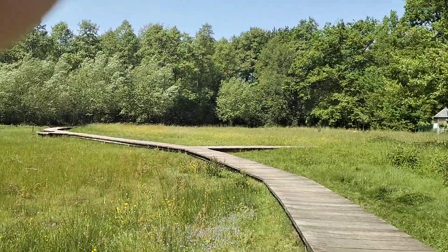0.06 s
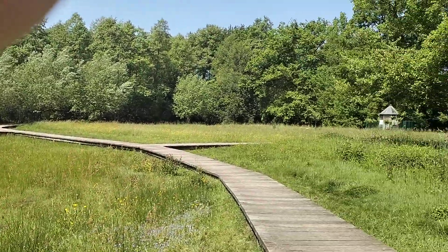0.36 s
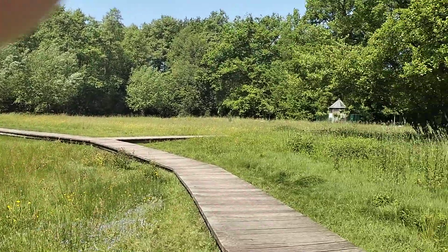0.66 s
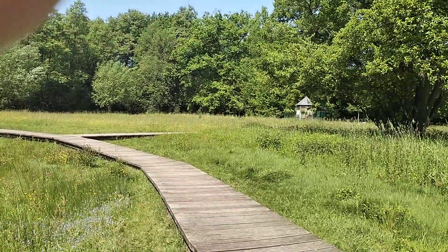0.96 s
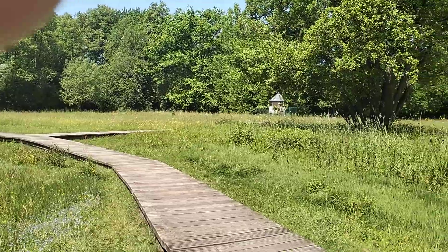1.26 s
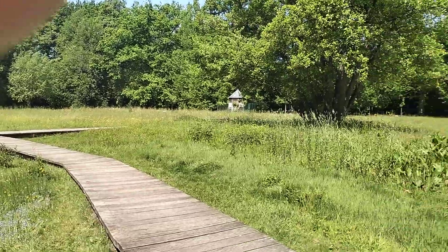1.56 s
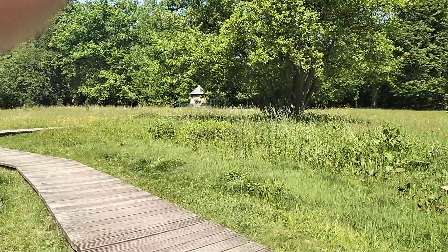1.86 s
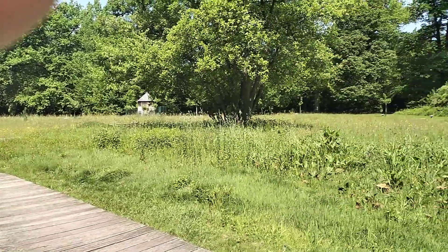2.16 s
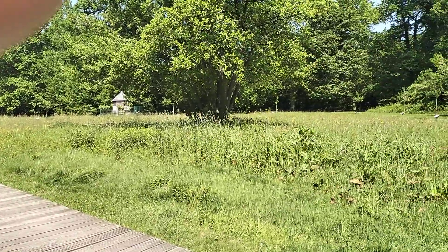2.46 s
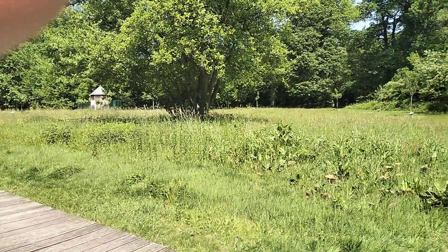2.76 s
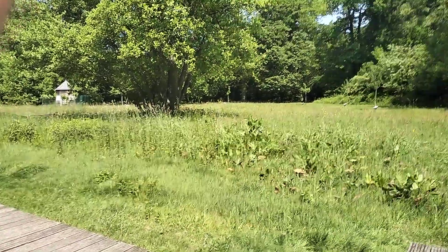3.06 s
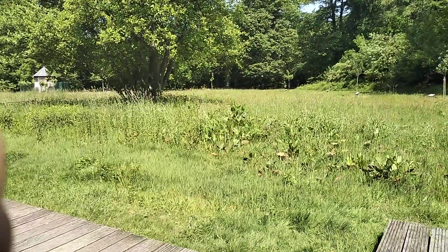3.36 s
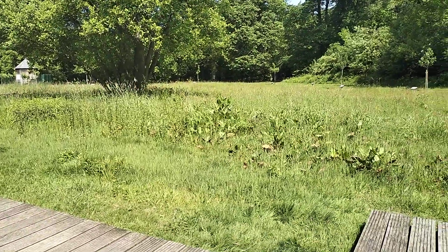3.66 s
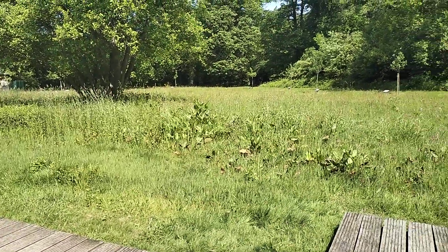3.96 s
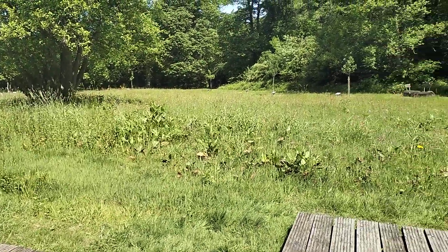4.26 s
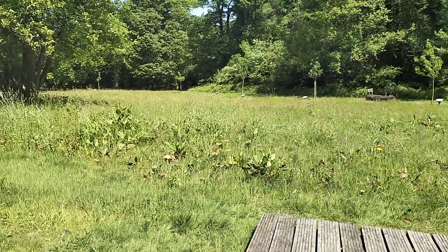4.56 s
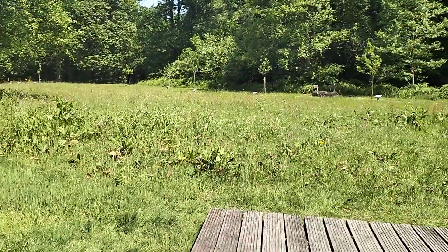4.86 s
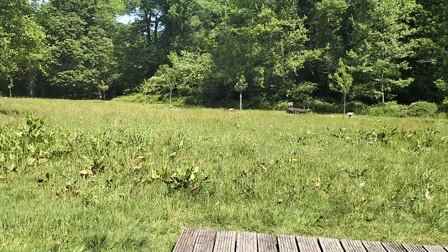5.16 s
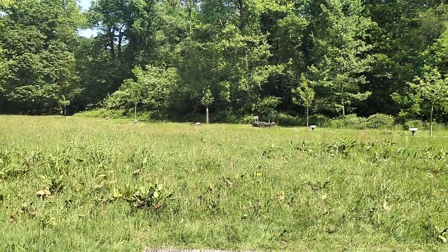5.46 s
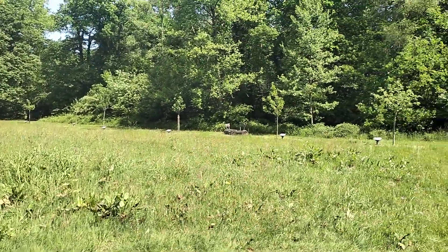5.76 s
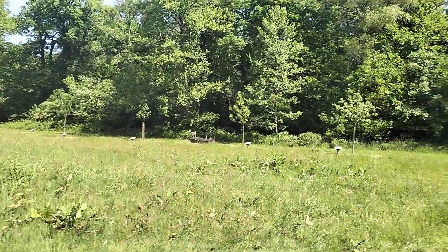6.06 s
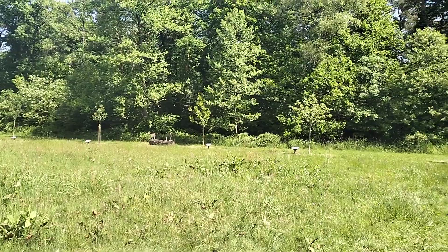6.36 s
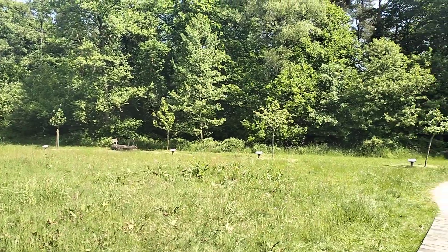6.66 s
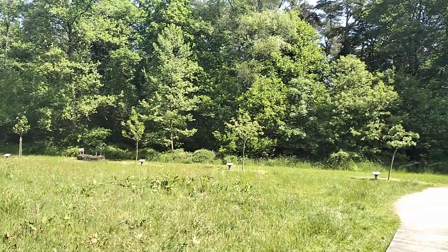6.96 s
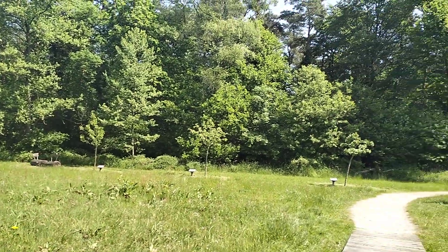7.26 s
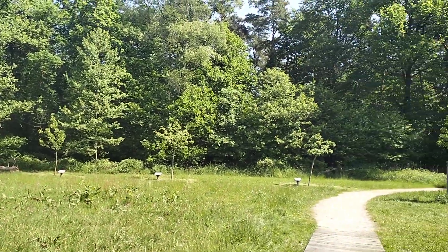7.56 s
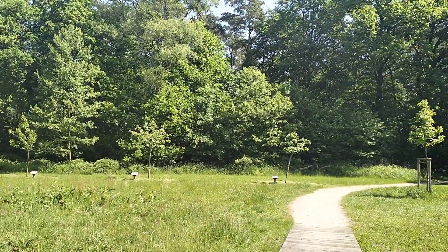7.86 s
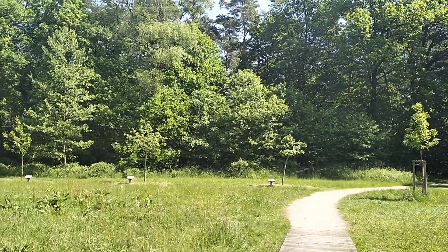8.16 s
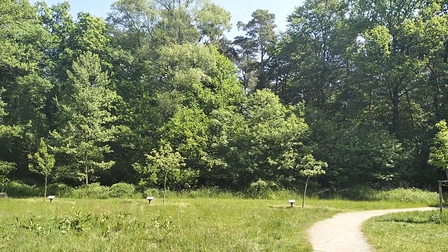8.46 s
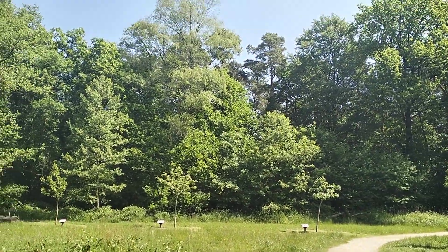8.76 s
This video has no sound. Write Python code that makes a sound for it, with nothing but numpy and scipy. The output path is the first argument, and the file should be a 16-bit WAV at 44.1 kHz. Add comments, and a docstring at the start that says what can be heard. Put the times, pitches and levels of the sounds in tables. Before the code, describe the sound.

Small songbirds chirp brightly at a forest edge, and a blackbird adds soft fluted notes that echo among the trees. About three seconds in, a finger knocks and rubs on the left of the hand-held microphone. A frog then rattles a long pulsed trill from the boggy meadow, pauses, and a second trill follows along with more birdsong. Light wind rumble and a distant murmur lie underneath.

```python
"""A boggy meadow at a forest edge, heard from a hand-held phone that turns slowly.
Frogs rattle long trills in front: each snap of the larynx rings the vocal sac for a few cycles.
A blackbird and small songbirds whistle from the trees, which echo them. The distant murmur of the
landscape and a light wind lie underneath. Once a finger knocks on the phone's case and strokes
its left microphone."""
import sys
import numpy as np
from scipy import signal
from scipy.fft import rfft, irfft
from scipy.io import wavfile

SR = 44100
rng = np.random.default_rng(int(sys.argv[2]) if len(sys.argv) > 2 else 0)


def master(y):
    """Save y as 16-bit WAV."""
    cut = np.clip(np.atleast_2d(y).T, -1, 1)
    pcm = np.round(cut * 32767)  # scale
    wavfile.write(sys.argv[1], SR, pcm.astype(np.int16))


N = 393813
T = np.arange(N) / SR


def undb(db):
    """Decibels to gain."""
    return 10 ** (np.asarray(db) / 20)


def curves(table, t=T):
    """The columns of a table, joined by straight lines in time."""
    times, *columns = np.transpose(table)
    return [np.interp(t, times, column) for column in columns]


def mics(pan_db):
    """Gains at the two microphones; pan is always left minus right."""
    return undb(np.array([[.5], [-.5]]) * pan_db)


def add(out, s, sound):
    """Mix a stereo sound in at s seconds."""
    i = int(s * SR)
    a, b = max(i, 0), min(i + sound.shape[1], N)
    if b > a:
        out[:, a:b] += sound[:, a - i:b - i]


def walk(rate_hz, size=N):
    """Random wander: straight lines between chance values."""
    steps = np.arange(size) / SR * rate_hz
    count = int(steps[-1]) + 2
    return 1.75 * np.interp(steps, np.arange(count), rng.standard_normal(count))


def swell(s, width):
    """A smooth rise and fall around a moment."""
    return np.exp(-((T - s) / width) ** 2)


def noise(colour, alike=0):
    """Stereo noise of rms 1 from (frequency [Hz], level [dB]) rows; alike correlates the two sides."""
    hz, db = np.transpose(colour)
    log_hz = np.log(np.maximum(np.fft.rfftfreq(N, 1 / SR), 1))
    outside = log_hz - np.clip(log_hz, np.log(hz[0]), np.log(hz[-1]))
    gain = undb(np.interp(log_hz, np.log(hz), db) - 75 * abs(outside))
    mid, side = irfft(rfft(rng.standard_normal((2, N))) * gain, N)
    x = np.sqrt(1 + alike) * mid + np.sqrt(1 - alike) * side * np.array([[1], [-1]])
    return x / x.std()


def echo(x, t60, onset_s):
    """Trunks, crowns or reeds scatter a sound into a diffuse, fading tail."""
    t = np.arange(SR) / SR
    tail = rng.standard_normal((2, SR)) * undb(-60 * t / t60) * (1 - np.exp(-t / onset_s))
    return signal.fftconvolve(x, tail / np.sqrt(np.sum(tail ** 2) / 2), axes=1)[:, :N]


def whistle(hz, db, waver, edge_s=.006):
    """A bird's nearly pure tone, with a slightly unsteady pitch and soft ends."""
    t = np.arange(len(hz)) / SR
    phase = 2 * np.pi * np.cumsum(hz * (1 + waver * walk(250, len(hz)))) / SR
    fade = np.clip(np.minimum(t, t[-1] - t) / edge_s, 0, 1)
    return np.sqrt(2) * undb(db) * np.sin(phase) * fade


def ring(hz, rise_s, db):
    """A heavily damped ring that peaks after its rise time."""
    t = np.arange(SR // 12) / SR
    return t / rise_s * np.exp(1 - t / rise_s) * np.sin(2 * np.pi * hz * t) * undb(db)


# Open land, far off (time [s], relative level [dB], pan [dB])
MURMUR = [(0, -59, 1.5), (2.2, -57.5, 3), (2.9, -54.5, 0), (3.7, -57.5, -3), (6.5, -56.5, -3),
          (7.7, -55, -4.5), (8.9, -55.5, -3)]
# Its tone from the meadow (frequency [Hz], relative level [dB])
MURMUR_COLOUR = [(300, -31), (420, -9.5), (620, -1), (1050, 2.5), (1450, -1), (1900, -1.5), (2300, -3.5),
                 (2700, -18), (3400, -33)]


def murmur(right_lead_s=.00031):
    """The far murmur of the land, reaching the right microphone first."""
    db, pan_db = curves(MURMUR)
    left, right = noise(MURMUR_COLOUR, alike=.35)
    arriving = np.array([np.interp(T - right_lead_s, T, left), right])
    return arriving * undb(db + 6.5 + .85 * walk(14)) * mics(np.clip(pan_db, -4, 4))


# Low hum in the distance (time [s], level [dB])
HUM = [(0, -67), (5.4, -68), (8.9, -81.5)]
# Wind rumble, much alike at both microphones (frequency [Hz], relative level [dB])
RUMBLE = [(20, -16.5), (35, -4), (58, 1.5), (90, -1.5), (140, -10), (260, -14.5), (500, -30.5)]
# Eddies right at the microphones (time [s], half-width [s], level [dB], pan [dB])
EDDIES = [(.18, 0.032, -43, 2), (2.15, 0.016, -45.5, -27), (2.305, 0.04, -54, -27),
          (4.854, 0.046, -45.5, -25), (4.96, 0.021, -45.5, -19), (5.041, 0.024, -46.5, -13),
          (7.075, 0.028, -48, -14)]


def wind():
    """Short eddies strike mostly one microphone, over a steady rumble and a far hum."""
    eddies = sum(undb(db) * mics(pan_db) * swell(s, width) for s, width, db, pan_db in EDDIES)
    buffets = eddies * noise([(22, -6), (50, 4), (90, -3.5), (160, -26), (350, -29)], alike=.26)
    hum = noise([(130, -2.5), (270, 7.5), (380, -8.5)], alike=.63)
    hum *= undb(curves(HUM)[0] + .5 * walk(17))
    rumble = noise(RUMBLE, alike=.83) * undb(-56 + 1.3 * walk(9))
    return buffets + hum + rumble


# Faint stirrings around the meadow (time [s], half-width [s], level [dB])
RUSTLES = [(1.855, 0.27, -76), (2.198, 0.015, -72), (2.712, 0.053, -68), (6.35, 0.32, -79)]


def rustles(rest_db=-87):
    """A high rustle swells now and then over a thin, steady hiss."""
    stir = undb(rest_db) + sum(undb(db) * swell(s, width) for s, width, db in RUSTLES)
    rustle = noise([(6000, 7.5), (8000, -1), (11000, 1.5), (14000, -6)]) * stir * undb(.83 * walk(32))
    hiss = noise([(5000, -10), (9000, -17), (13000, 23), (15000, 4.5)]) * undb(-87.5)
    return rustle + hiss


# Songbird syllables at the beak, by name: (flutter rate [Hz], flutter depth [share of pitch], shape),
# with shape rows (time [s], pitch [Hz], relative level [dB])
SYLLABLES = { "hook": (0, 0, [(0, 3400, -22), (.017, 3050, -8), (.024, 2800, -30), (.029, 3750, -9),
             (.039, 4520, -4), (.055, 5150, -1), (.058, 6000, -24), (.062, 3950, -4), (.083, 2950, -14)]),
             "arch": (170, 0.016, [(0, 3460, -9), (.016, 2944, 3), (.024, 2800, -23), (.029, 3840, -4),
             (.039, 4500, -0.5), (.054, 5350, -17), (.057, 4500, -15), (.061, 3920, 2.5),
             (.083, 2890, -13)]), "pipe": (92, 0.019, [(0, 4545, 8.5), (.05, 4630, 6), (.16, 4570, 6.5)]),
             "drop": (390, 0.036, [(0, 5370, -10), (.006, 6210, -8), (.011, 5620, -22), (.017, 6150, -3),
             (.028, 5150, -7.5), (.038, 4900, -23), (.047, 4620, 4), (.057, 4230, -4), (.062, 3470, -1.5),
             (.074, 3080, 1)]), "flick": (124, 0.04, [(0, 7100, -21), (.015, 6000, 1.5), (.031, 4500, -7)]),
             "chip": (0, 0, [(0, 5370, -16), (.008, 5950, -1), (.035, 5800, -6.5)]),
             "peep": (180, 0.0056, [(0, 3455, 11.5), (.09, 3410, -4)]),
             "buzz": (100, 0.13, [(0, 4680, -2.5), (.05, 4105, -0.5), (.11, 3447, 3), (.18, 2725, -2)]),
             "dip": (200, 0.11, [(0, 4300, -4.5), (.03, 3645, -3.5), (.058, 2750, 0.5)]),
             "climb": (55, 0.079, [(0, 2800, -4), (.05, 3780, -3), (.082, 5210, -7.5), (.112, 5850, -5),
             (.137, 5780, -9)]), "sip": (0, 0, [(0, 4130, 6.5), (.018, 3600, 0.5), (.036, 3007, -14.5)]),
             "seep": (78, 0.047, [(0, 6800, -11), (.04, 5870, 2.5), (.09, 5650, -8)]),
             "thin": (110, 0.024, [(0, 7600, -1), (.04, 7830, -3), (.14, 7750, -15)])}


def syllable(name, ratio, db, chop_db=58.5):
    """One sweeping note, never twice the same; a flutter in the syrinx shakes its pitch and level."""
    flutter_hz, depth, shape = SYLLABLES[name]
    t = np.arange(int(shape[-1][0] * SR)) / SR
    hz, shape_db = curves(shape, t)
    pitch_luck, scatter_db, rate_luck = rng.standard_normal(3)
    flutter = depth * np.sin(2 * np.pi * flutter_hz * (1 + .03 * rate_luck) * t)
    pitch = hz * ratio * (1 + .012 * pitch_luck + flutter)
    return whistle(pitch, db + scatter_db + shape_db + chop_db * flutter, waver=.0098, edge_s=.005)


# Tone of leaves and birds deep in the wood (frequency [Hz], relative level [dB])
CANOPY_COLOUR = [(1500, 8.5), (2500, 8), (3500, 9.5), (4600, 4.5), (6000, -2.5), (7500, -7.5), (10000, -62)]
# The canopy from the forest edge (time [s], relative level [dB], pan [dB])
CANOPY = [(0, -55, 15), (.9, -53, 0.5), (1.4, -58.5, 4.5), (2.8, -57, 7.5), (3.5, -68, 6.5), (5.7, -62, 3),
          (6.4, -62.5, 1), (7.1, -65, 4.5), (8.2, -57, -1), (8.9, -62.5, 1)]


def canopy(calls=340):
    """Leaves hiss, and many small, far voices blur together among the trees."""
    leaves = noise(CANOPY_COLOUR) * undb(-5 + 1.3 * walk(25))
    birds = np.zeros((2, N))
    for when, kind, octave, loud in rng.random((calls, 4)):
        name = ["sip", "chip", "sip", "flick"][int(kind * 4)]
        hz, own_hz = 3000 * 2 ** octave, SYLLABLES[name][2][1][1]
        call_db = np.interp(hz, *np.transpose(CANOPY_COLOUR)) + 2 * loud
        add(birds, when * N / SR, syllable(name, hz / own_hz, call_db) * mics(0))
    birds = echo(birds, t60=.45, onset_s=.01)
    db, pan_db = curves(CANOPY)
    return (leaves + birds / birds.std() * undb(-6)) * undb(db) * mics(pan_db)


# High in the crowns, a little to the right (time [s], pitch [Hz], pitch spread [Hz], level [dB])
TWITTER = [(5.749, 7500, 497, -85), (5.95, 7500, 500, -80), (6.5, 7400, 453, -80), (6.75, 7500, 150, -89),
           (7.65, 7750, 170, -81), (8.25, 7400, 217, -74), (8.55, 7300, 180, -82)]


def twitter(rate_hz=140):
    """A tiny bird twitters very fast around one thin pitch, in uneven spurts; the crowns blur it."""
    t = np.arange(TWITTER[0][0], TWITTER[-1][0], 1 / SR)
    hz, spread_hz, db = curves(TWITTER, t)
    pitch = hz + spread_hz * walk(rate_hz, len(t)) / 2
    voice = whistle(pitch, db + 3 * walk(14, len(t)), waver=.011)
    out = np.zeros((2, N))
    add(out, t[0], voice * mics(-2.6))
    return echo(out, t60=.089, onset_s=.0022)


# Blackbird, back inside the wood
# (time [s], length [s], start pitch [Hz], middle pitch [Hz], end pitch [Hz], relative level [dB])
BLACKBIRD_NOTES = [(2.007, 0.12, 2370, 2354, 2080, -49.5), (2.29, 0.17, 1800, 2016, 2007, -52.5),
                   (2.52, 0.11, 1720, 1650, 1550, -53), (2.87, .09, 1880, 1910, 1886, -53),
                   (4.663, 0.13, 2130, 2053, 2017, -51.5), (4.85, 0.08, 2100, 2072, 1860, -56),
                   (5.564, .12, 2450, 2260, 2290, -53.5), (5.781, 0.09, 2120, 2192, 2274, -49),
                   (6.919, 0.17, 1900, 2224, 2297, -49), (7.062, .14, 2310, 2237, 2135, -48.5),
                   (7.194, 0.12, 2110, 2252, 2304, -46.5), (7.016, 0.18, 3480, 3730, 3730, -59.5),
                   (7.592, 0.085, 1910, 1934, 1930, -56.5), (7.986, 0.14, 1700, 1920, 2005, -45),
                   (8.225, 0.17, 1930, 1816, 1865, -45.5), (8.76, 0.16, 1960, 1970, 2120, -50)]
# Its side as the phone turns (time [s], pan [dB])
BLACKBIRD_PAN = [(2, 2.5), (4.7, 1.5), (8.9, -8)]


def blackbird(swell_db=2.5, edge_s=.03):
    """Slow fluted notes swell along a bend in pitch, blurred by leaves and echoed by trunks."""
    out = np.zeros((2, N))
    for s, length, start, middle, end, db in BLACKBIRD_NOTES:
        progress = np.minimum(np.arange(int((length + edge_s) * SR)) / SR / length, 1)
        hz = np.polyval(np.polyfit([0, .5, 1], [start, middle, end], 2), progress)
        effort_db = db - swell_db * np.maximum(1 - 3 * progress, 0) + 1.5 * walk(48, len(hz))
        note = whistle(hz, effort_db, waver=.0057, edge_s=edge_s)
        add(out, s, note * mics(curves(BLACKBIRD_PAN, s)[0]))
    leaves = undb(-7) * echo(out, t60=.16, onset_s=.0018)
    trunks = undb(-4.5) * echo(out, t60=1, onset_s=.012)
    return undb(-2) * out + leaves + trunks


# Songbirds in the trees, near and far
# (time [s], syllable, count, pitch [ratio], relative level [dB], echo send [dB])
PHRASES = [(-.014, "hook", 3, 1, -29.5, -12), (-.02, "thin", 1, 1.035, -61, -3),
           (.409, "flick", 1, 1, -45, -7), (.493, "flick", 1, 1.02, -46, -7),
           (.563, "dip", 1, 1, -39.5, -10), (.619, "climb", 1, 1, -43, -11), (.84, "pipe", 1, 1.01, -69, 2),
           (.92, "dip", 1, .75, -57, 2), (1.35, "pipe", 1, 1, -72, 1), (1.32, "flick", 1, 1.05, -59, -5),
           (1.535, "sip", 8, .95, -58.5, -7), (2.596, "seep", 1, 1, -58, -3),
           (2.81, "sip", 1, 1.55, -66, 3), (4.055, "peep", 1, 1, -59, -8), (5.13, "seep", 1, 1.17, -69, -2),
           (5.32, "dip", 1, 1.02, -57, -4), (6.64, "buzz", 1, .95, -64, 3), (7.21, "buzz", 1, .92, -62, -2),
           (7.4, "pipe", 1, .75, -61, -5), (7.565, "dip", 1, .98, -55, -4), (7.622, "chip", 1, 1, -55, -8),
           (7.742, "chip", 1, .8, -50, -8), (7.857, "drop", 5, 1, -52.5, -8),
           (8.426, "arch", 4, 1, -46, -4)]
# Each singer's tempo (syllable: repeat interval [s])
REPEAT_S = {"hook": .1338, "arch": .136, "sip": 0.12, "drop": .1138}
# The side the song comes from (time [s], pan [dB])
SONG_PAN = [(.5, 10), (.56, -6), (.62, 11), (.9, 14), (2.7, 28), (4, -2), (6.8, 6.5), (8.4, 5.5)]


def songbirds(crescendo_db=.54, pitch_sag=.00732):
    """Phrases repeat a syllable, a little louder and lower each time; far singers carry more echo."""
    direct, send = np.zeros((2, N)), np.zeros((2, N))
    for start, name, count, ratio, db, echo_db in PHRASES:
        for k in range(round(count)):
            s = start + k * REPEAT_S.get(name, 0)
            note = syllable(name, ratio * (1 - k * pitch_sag), db + k * crescendo_db)
            pan_db = curves(SONG_PAN, s)[0]
            add(direct, s, note * mics(pan_db))
            add(send, s, note * mics(.5 * pan_db) * undb(echo_db))
    foliage = undb(-2) * echo(send, t60=.1, onset_s=.00076)
    deep_wood = undb(-5) * echo(send, t60=1.45, onset_s=.0092)
    return undb(-10.5) * direct + foliage + deep_wood


# Modes of the case around the microphones (frequency [Hz], rise [s], relative level [dB])
CASE_MODES = [(3310, 0.00011, 4), (1910, 0.00011, -11), (4700, 0.00011, -26), (11600, 0.000081, -7),
              (584, 0.00062, -48)]
# Finger knocks beside the left microphone (time [s], relative level [dB], pan [dB])
KNOCKS = [(3.0316, -23.5, 32), (3.04, -34, 35), (3.0412, -30, 34), (3.044, -23, 32.5), (3.0635, -43, 25),
          (3.167, -36.5, 16)]
# Soft bumps on the phone (time [s], frequency [Hz], rise [s], level [dB], pan [dB])
BUMPS = [(2.98, 257, 0.00077, -44, 33.5), (3.032, 183, 0.0013, -32, 29), (4.87, 246, 0.0032, -35, 3)]


def finger_knocks():
    """Knocks ring the damped modes of the case; soft bumps give one dull, low ring each."""
    out = np.zeros((2, N))
    knock = sum(ring(*mode) for mode in CASE_MODES)
    for s, db, pan_db in KNOCKS:
        add(out, s, knock * undb(db) * mics(pan_db))
    for s, hz, rise_s, db, pan_db in BUMPS:
        add(out, s, ring(hz, rise_s, db) * mics(pan_db))
    return out


# Rasp and fine hiss of skin on the port (frequency [Hz], relative level [dB])
SKIN_RASP = [(200, -11), (700, -7.5), (1800, -2), (3300, -1), (5000, -4), (7000, -17), (14000, -31)]
SKIN_HISS = [(2000, -21), (4500, 0), (6500, -3.5), (9000, -7.5), (12500, -2), (14500, -16)]
# Strokes right on the left microphone (start [s], end [s], relative rasp [dB], relative hiss [dB])
STROKES = [(2.875, 3.063, -53, -62.5), (3.025, 3.123, -39.5, -58), (3.117, 3.174, -33, -50),
           (3.18, 3.312, -47, -42)]


def finger_strokes(swell_db=10, release_s=.0059):
    """Skin drags unevenly across the left port; pressure builds through a stroke, then lets go."""
    rasp, hiss, slide = noise(SKIN_RASP), noise(SKIN_HISS), 0
    for start, end, rasp_db, hiss_db in STROKES:
        pressure = undb(np.interp(T, [start, end], [-swell_db, 0])) * (T > start)
        release = np.exp(-np.clip((T - end) / release_s, 0, 20))
        slide += pressure * release * (undb(rasp_db) * rasp + undb(hiss_db) * hiss)
    return slide * undb(.46 * walk(640)) * undb([[-1], [-23]])


# Frogs in the bog, one list of evenly spaced runs per trill (time [s], snaps until the next row)
TRILLS = [
    [(3.19, 10), (3.619, 2), (3.711, 1), (3.749, 1), (3.796, 1), (3.834, 2), (3.928, 1), (3.962, 2),
     (4.05, 1), (4.105, 2), (4.174, 8), (4.526, 4), (4.712, 9), (5.108, 2), (5.206, 1), (5.243, 4),
     (5.412, 3), (5.542, 1), (5.576, 3), (5.7, 4), (5.876, 1), (5.936, 2), (6.014, 1)],
    [(7.38, 6), (7.645, 1), (7.681, 5), (7.896, 6), (8.168, 3), (8.316, 11), (8.827, 1)],
]
# After-snaps that burst out as hard as a main one (time [s], level [dB])
DOUBLE_SNAPS = [(3.373, -37), (3.633, -31), (3.68, -34), (3.764, -32), (3.85, -34), (3.979, -33),
                (4.193, -37), (4.764, -31), (5.126, -35), (5.339, -30), (5.605, -35)]
# How hard the frogs call
# (time [s], snap level [dB], after-snap against snap [dB], sac pitch [Hz], throat ring gain [dB])
EFFORT = [(3.2, -41, -4, 2200, -12), (3.66, -32.5, -10, 2400, -17), (3.95, -29.5, -14, 2650, -9),
          (4.5, -31, -17, 2570, -9), (5.5, -30, -13, 2600, -2.5), (5.8, -35, -9, 2560, -15),
          (6.02, -33, -9, 2330, -18), (7.4, -41, -1, 2370, -20), (7.75, -36, -10, 2450, -22),
          (8.4, -35.5, -7, 2400, -22), (8.6, -35.5, -1, 2300, -22)]


def larynx_snaps(fade_db=-7):
    """Times and levels of the snaps: a lurching beat, each with up to two looser, weaker after-snaps."""
    out = list(DOUBLE_SNAPS)
    for runs in TRILLS:
        times, counts = np.transpose(runs)
        for s in np.interp(np.arange(counts.sum()), np.cumsum(counts) - counts, times):
            db, after_db = curves(EFFORT, s)[:2]
            lag_s = .0125 - .0005 * after_db  # weaker after-snaps come later
            out.append((s + .0006 * rng.normal(), db + .9 * rng.normal()))
            for k in range(2):
                when = s + (k + 1) * lag_s + .0013 * rng.normal()
                level = db + after_db + k * fade_db + 2.5 * rng.normal()
                if all(abs(when - hard) > lag_s / 2 for hard, _ in DOUBLE_SNAPS):
                    out.append((when, level))
    return out


# Partials of the vocal sac (frequency [multiple of sac pitch], relative level [dB], decay [s])
SAC_PARTIALS = [(1, 2.5, 0.00099), (.79, -2.5, 0.0007), (1.75, -21, 0.0005)]
# Thin, high throat rings (frequency [Hz], relative level [dB], decay [s])
THROAT_RINGS = [(5520, -13.5, 0.0012), (7260, -29, 0.0011)]
# The sac slackens as the last trill ends (time [s], stretch of rise and decay [ratio])
SAC_SLACK = [(8.3, 1), (8.6, 1.8)]
# Where the frogs sit as the phone turns (time [s], pan [dB], lead of the left microphone [ms])
FROG_PLACE = [(3.2, -15.5, 0.55), (4.1, 1, 0.5), (5.6, -6, 0.45), (7.5, 1, 0.31), (8.8, -10, 0.21)]


def frogs(rise_s=.00085, sac_glide=.075, echo_db=-11):
    """Each snap of the larynx rings the vocal sac briefly; the pitch lifts as the sac tightens."""
    out, t = np.zeros((2, N)), np.arange(SR // 60) / SR
    for s, db in larynx_snaps():
        effort_db, _, hz, bright_db = curves(EFFORT, s)
        pan_db, lead_ms = curves(FROG_PLACE, s)
        slack = curves(SAC_SLACK, s)[0]
        pitch_luck, bright_luck, glide_luck, throat_luck = rng.standard_normal(4)
        age = np.maximum(t - np.array([[0], [lead_ms / 1000]]), 0)
        rise = rise_s * slack
        sweep = 1 + sac_glide * (1 + .3 * glide_luck) * np.tanh(age / rise - 1.7)
        cycles = hz * (1 + .025 * pitch_luck) * np.cumsum((age > 0) * sweep, axis=1) / SR
        attack = 1 - np.exp(-(age / rise) ** 2)
        ringing = np.maximum(age - rise, 0) / slack
        sac = sum(undb(part_db) * np.exp(-ringing / decay) * np.sin(2 * np.pi * multiple * cycles)
                  for multiple, part_db, decay in SAC_PARTIALS)
        # the high rings hardly weaken on soft snaps, so these sound brighter
        throat_db = bright_db + .75 * (effort_db - db) + 2 * bright_luck
        throat = sum(undb(ring_db + throat_db) * np.exp(-ringing / decay)
                     * np.sin(2 * np.pi * ring_hz * (1 + .017 * throat_luck) * age)
                     for ring_hz, ring_db, decay in THROAT_RINGS)
        add(out, s, (sac + throat) * attack * undb(db) / np.sqrt(slack) * mics(pan_db))
    # reeds and banks answer each snap a few milliseconds later
    return out + undb(echo_db) * echo(out, t60=.054, onset_s=.001)


def scene():
    """Everything that reaches the two microphones."""
    animals = frogs() + blackbird() + songbirds() + twitter()
    handling = finger_knocks() + finger_strokes()
    background = wind() + murmur() + canopy() + rustles()
    return animals + handling + background


def record(dry):
    """The phone cuts the treble steeply above 14.4 kHz."""
    return signal.sosfilt(signal.ellip(8, .2, 70, 14400, fs=SR, output="sos"), dry)


dry = scene()
out = record(dry)
master(out)
```